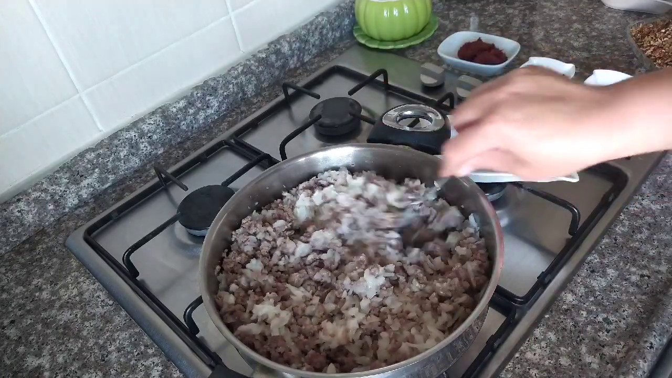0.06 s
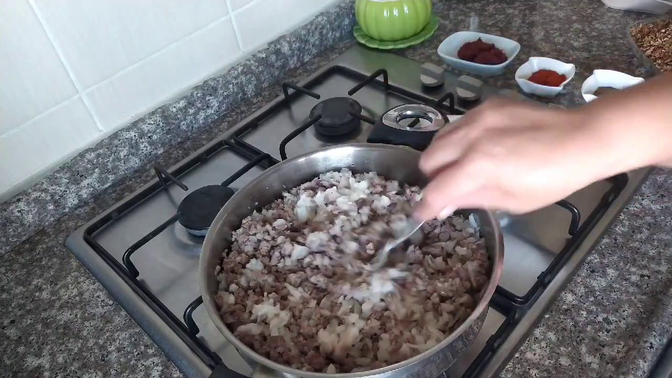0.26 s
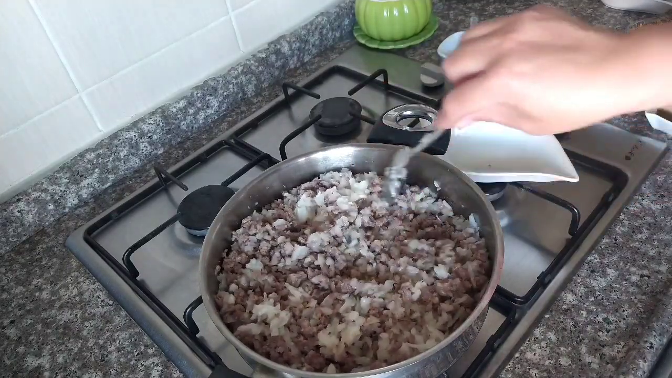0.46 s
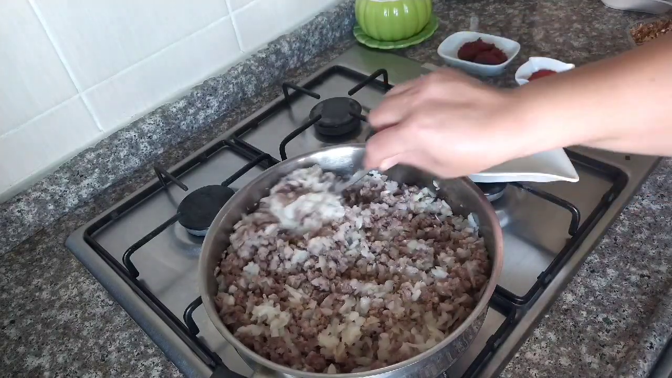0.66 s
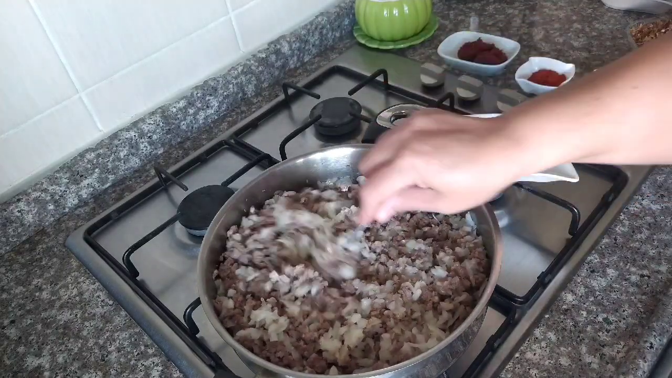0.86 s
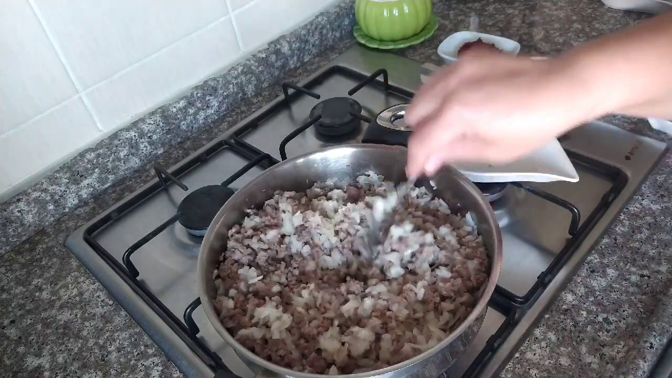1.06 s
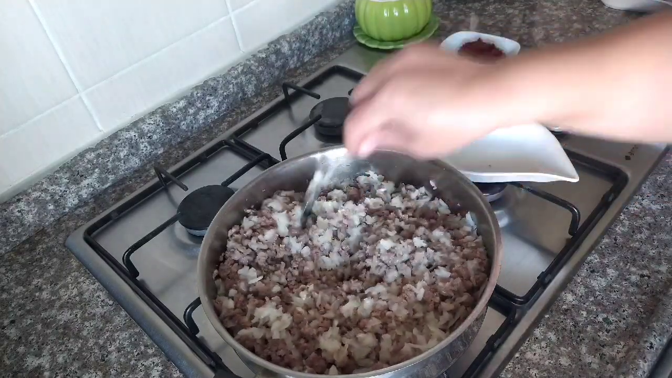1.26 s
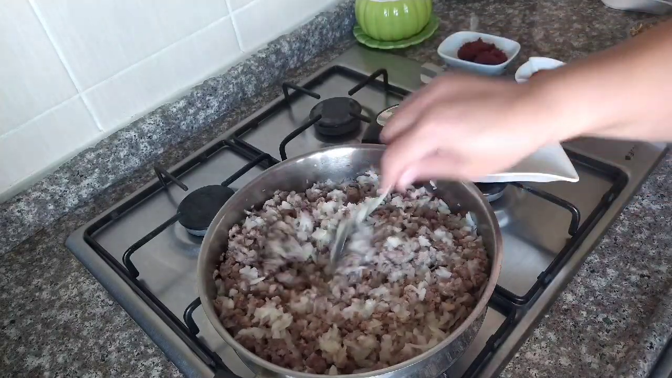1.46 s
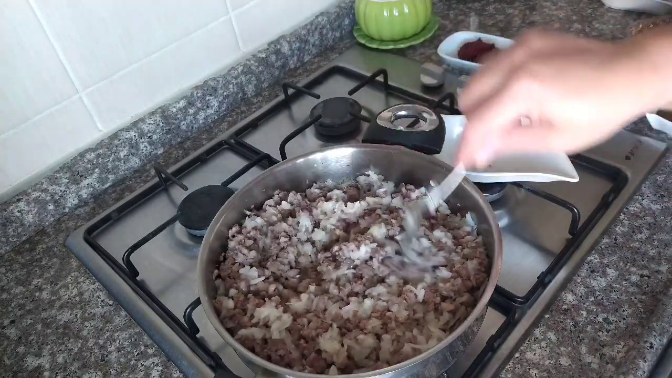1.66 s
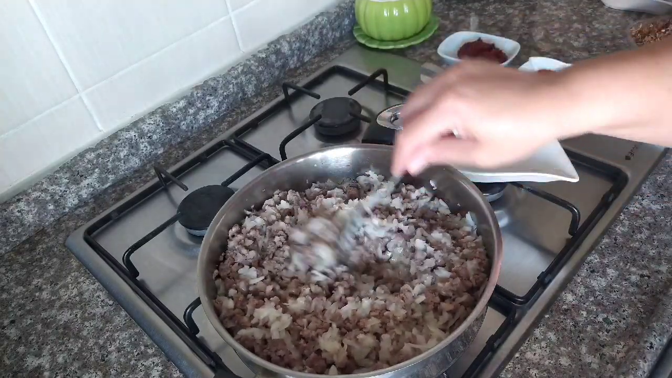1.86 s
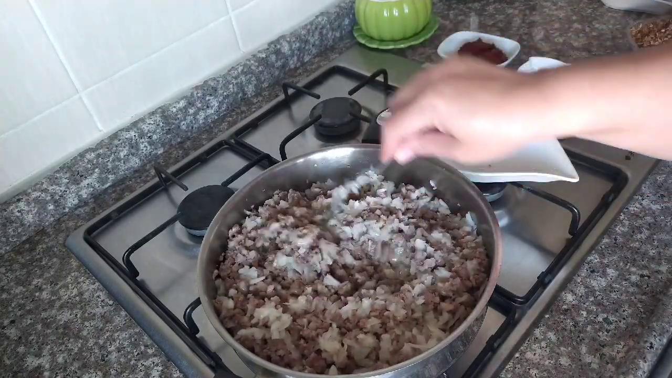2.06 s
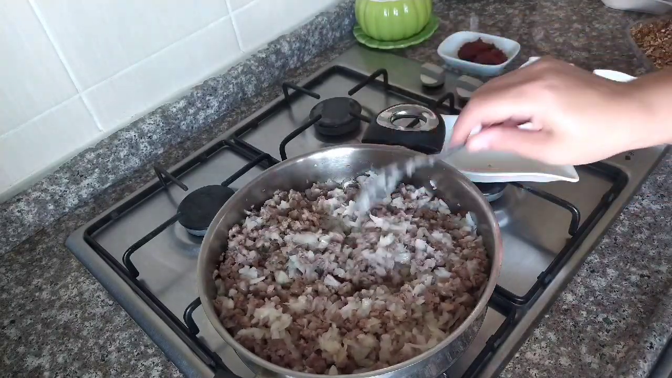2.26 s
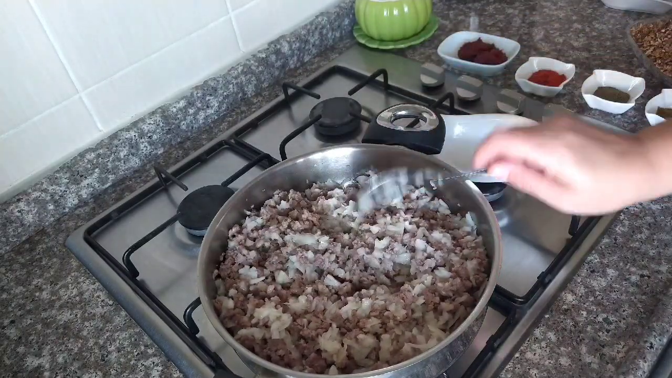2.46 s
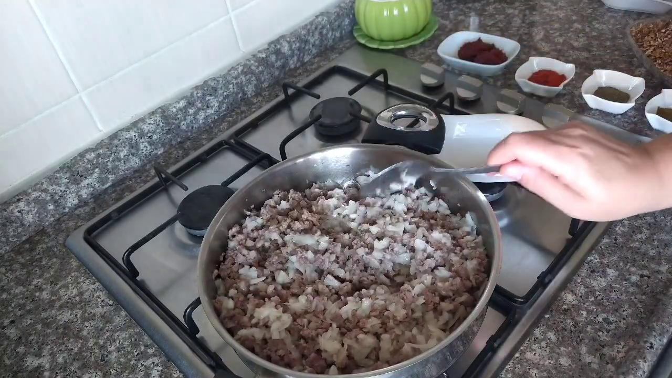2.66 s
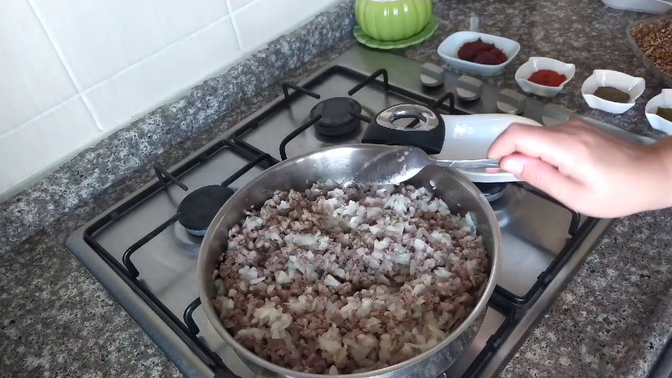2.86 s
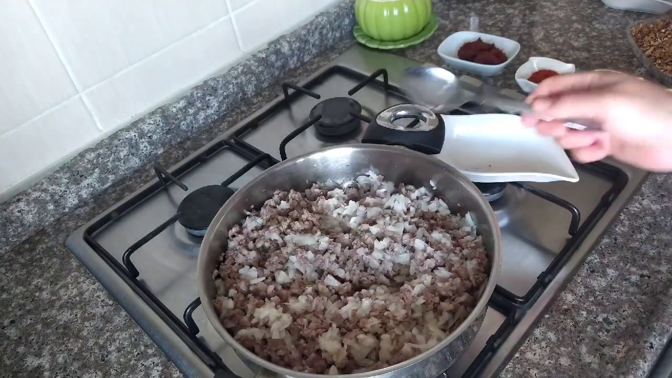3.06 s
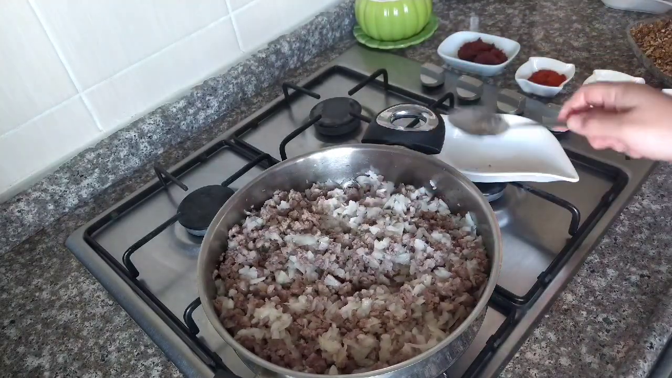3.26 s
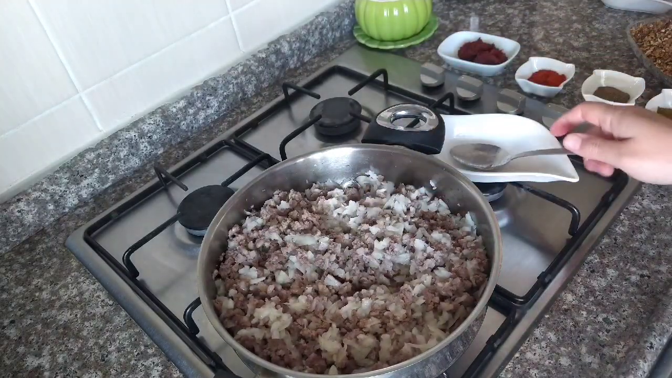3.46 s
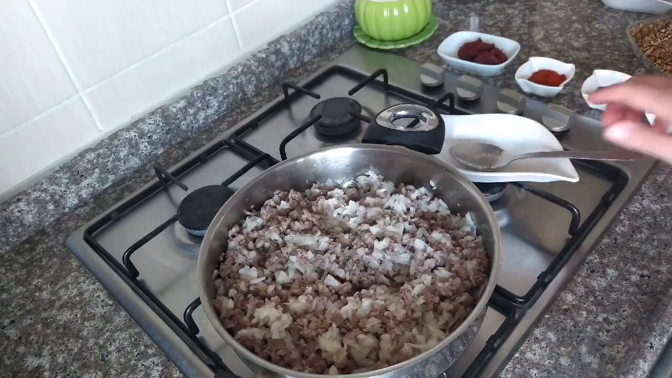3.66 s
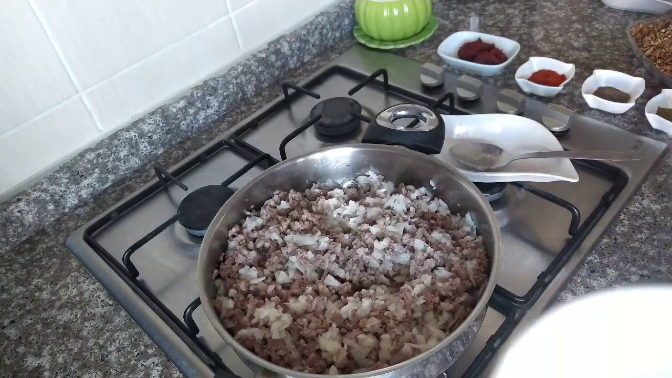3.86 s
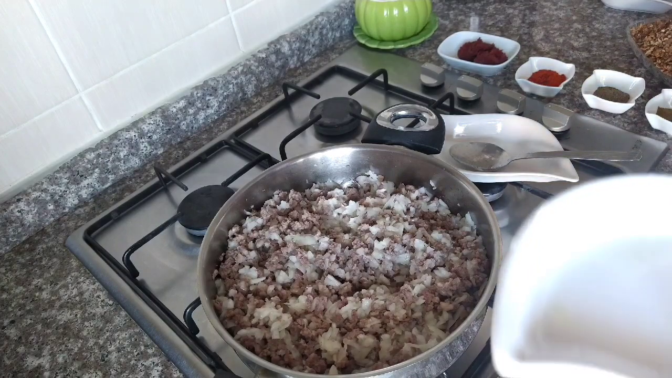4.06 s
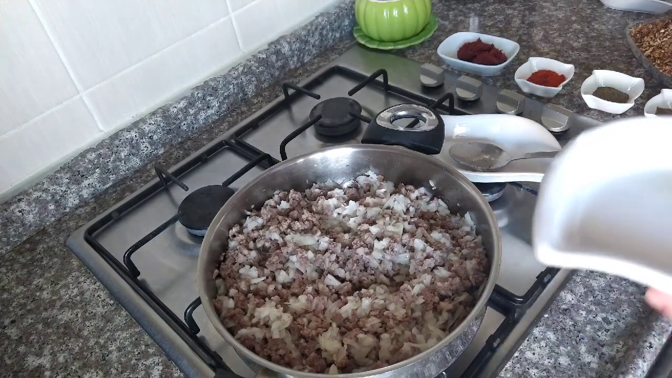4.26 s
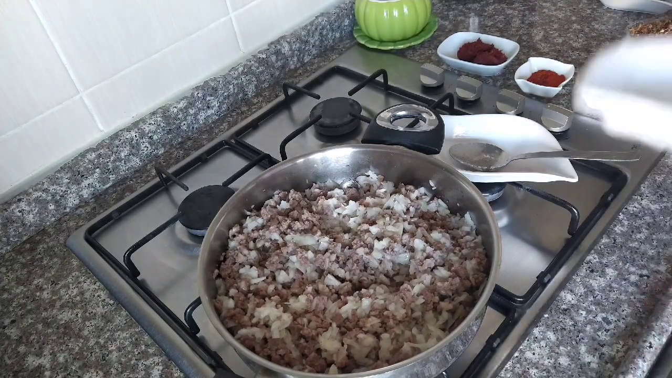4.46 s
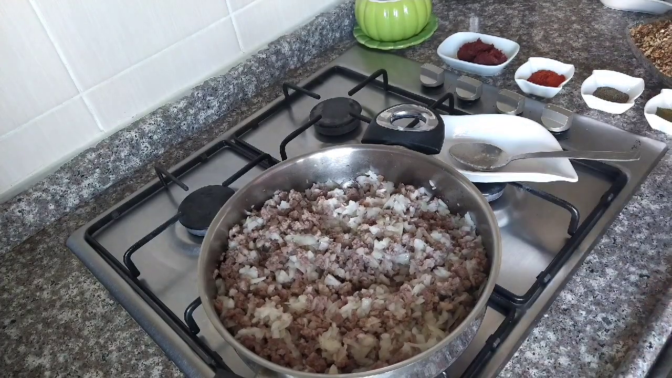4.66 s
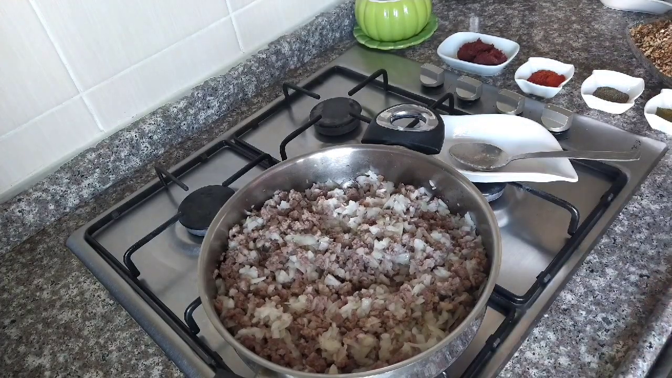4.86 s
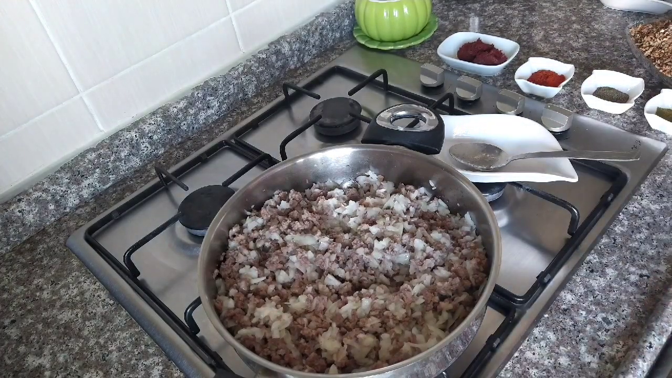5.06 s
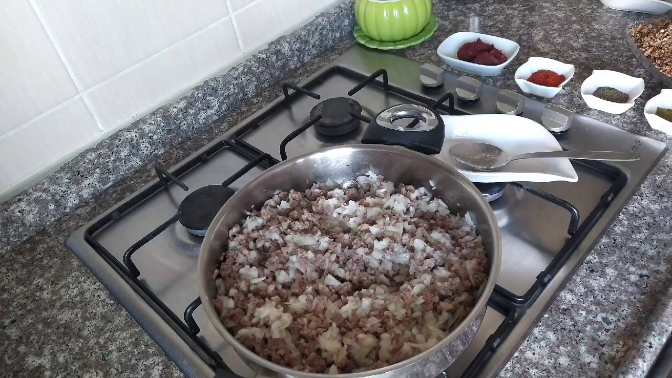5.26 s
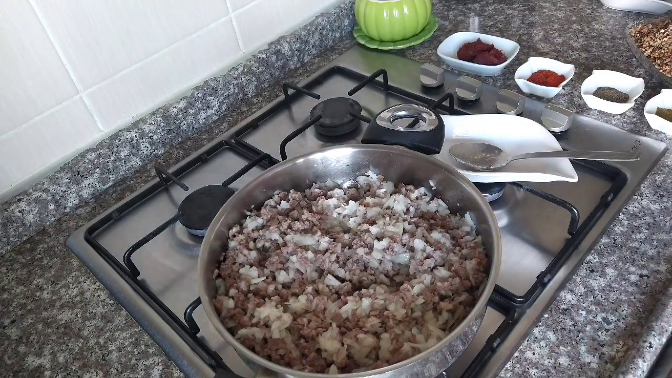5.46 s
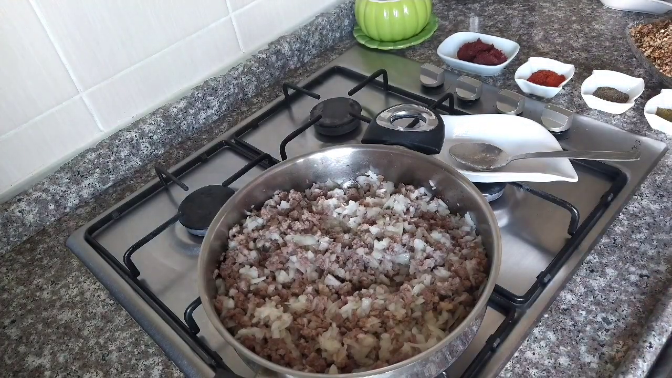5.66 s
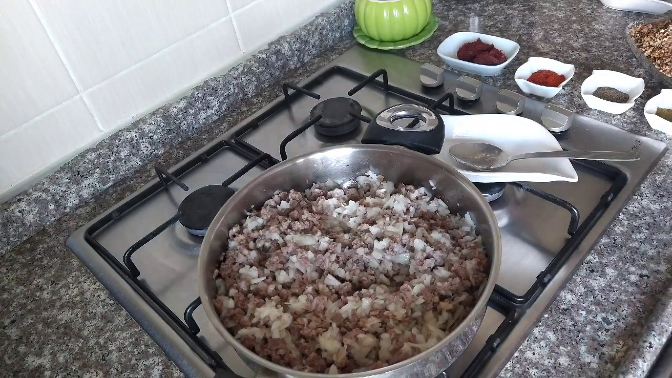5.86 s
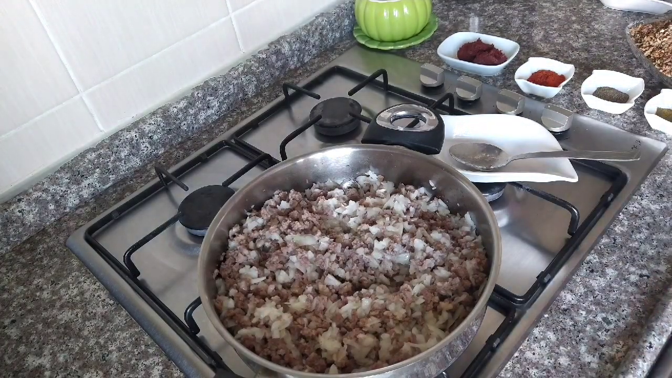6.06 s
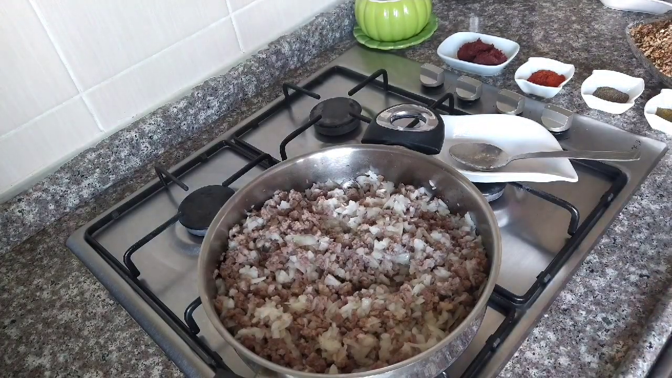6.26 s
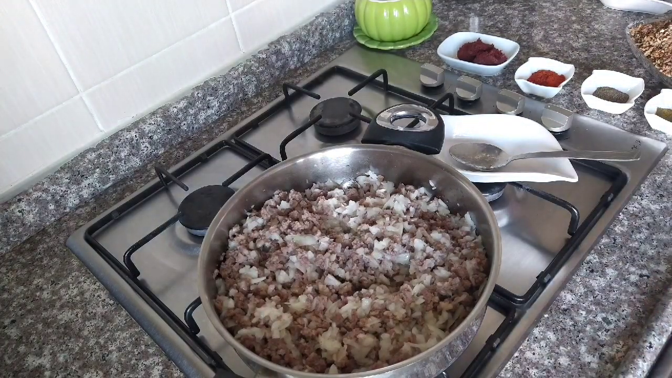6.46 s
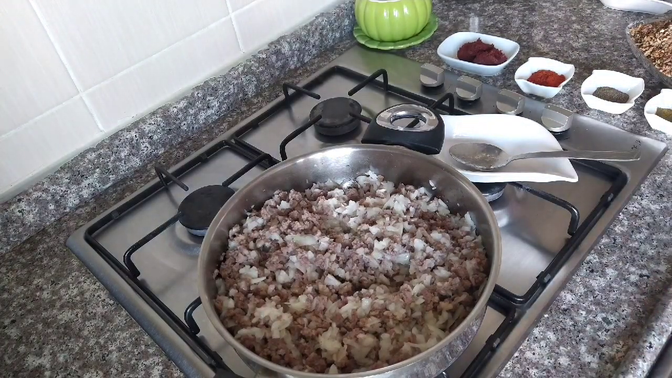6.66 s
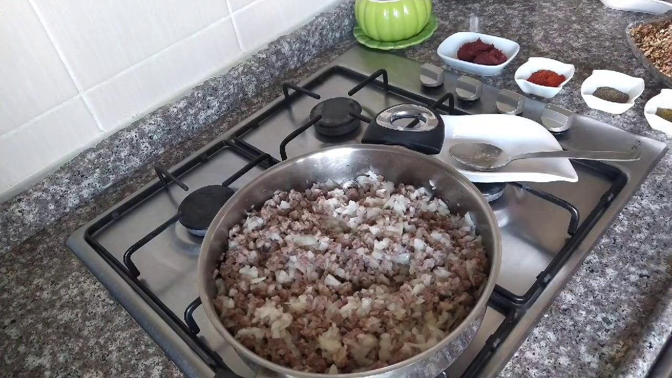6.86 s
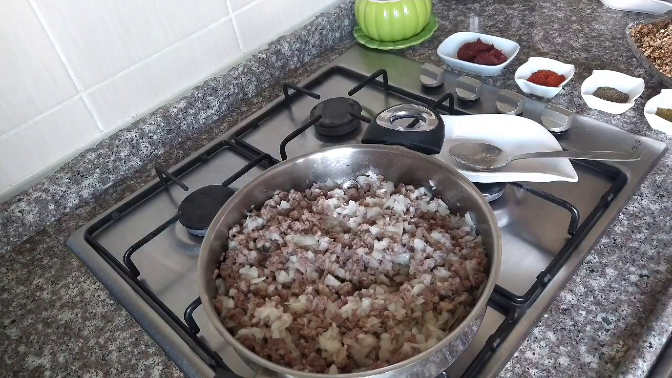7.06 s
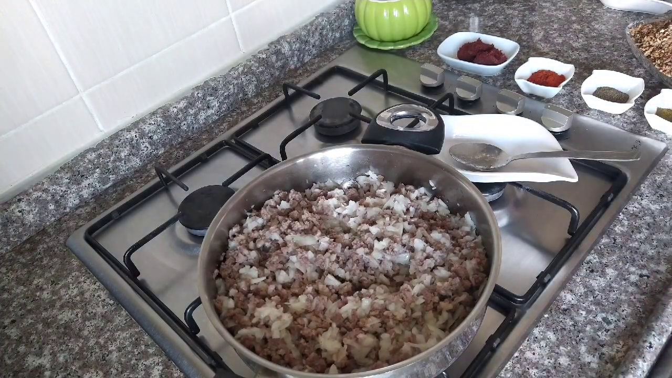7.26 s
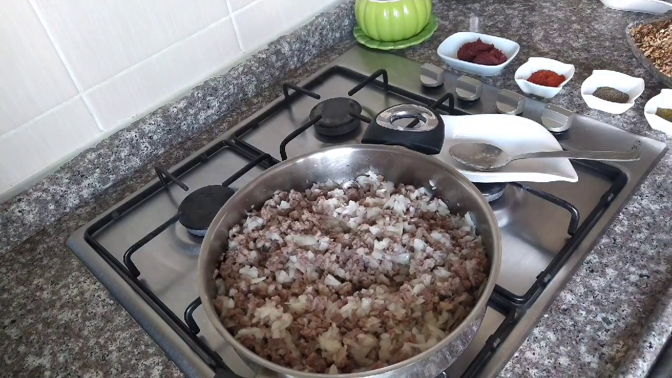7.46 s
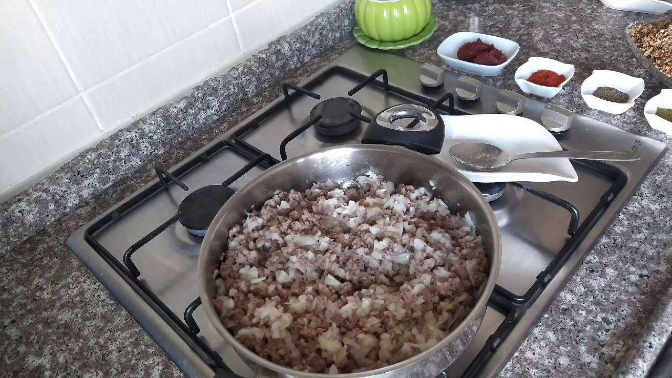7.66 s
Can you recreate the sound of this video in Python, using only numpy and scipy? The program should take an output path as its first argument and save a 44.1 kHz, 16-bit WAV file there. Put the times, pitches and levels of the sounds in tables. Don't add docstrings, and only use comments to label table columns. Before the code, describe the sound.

In a hard-walled kitchen, a metal spoon knocks sharply and scrapes briefly in a loaded steel pan, then gets tapped clean on the rim three times, each softer. It bounces lightly onto a china rest. After a stretch of quiet sizzling and low burner drone, a ceramic dish is bumped, set down rocking and clacked against another. Close stereo microphones catch the pan dry, with a short tiled-room tail.

```python
import sys
import numpy as np
from scipy import signal
from scipy.fft import rfft, irfft
from scipy.io import wavfile
from scipy.ndimage import uniform_filter1d, minimum_filter1d

SR = 44100
rng = np.random.default_rng(int(sys.argv[2]) if len(sys.argv) > 2 else 0)


def wav_out(sig):
    wavfile.write(sys.argv[1], SR, np.round(np.clip(np.atleast_2d(sig).T, -1, 1) * 32767).astype(np.int16))


def linear_from_db(decibels):
    return 10 ** (np.asarray(decibels, float) / 20)


N = 339862
TIME_S = np.arange(N) / SR


def level(x, rms_db):
    return x * linear_from_db(rms_db) / np.sqrt(np.mean(x ** 2))


def on_log(table, hz):
    table_hz, value = np.transpose(table)
    return np.interp(np.log(np.maximum(hz, 1)), np.log(table_hz), value)


def colour(x, table):
    size = x.shape[-1]
    gain = linear_from_db(on_log(table, np.fft.rfftfreq(size, 1 / SR)))
    return irfft(rfft(x) * gain, size)


def band(x, centre_hz, octaves):
    size = x.shape[-1]
    hz = np.maximum(np.fft.rfftfreq(size, 1 / SR), 1)
    return irfft(rfft(x) * np.exp(-(np.log2(hz / centre_hz) / octaves) ** 2), size)


def walk(rate_hz):
    hold = int(SR / rate_hz)
    steps = np.repeat(rng.standard_normal(N // hold + 1), hold)
    return 1.4 * uniform_filter1d(uniform_filter1d(steps, hold), hold)[:N]


def add(out, x, start_s, level_db, pan_db):
    i = int(start_s * SR)
    gain = linear_from_db(level_db + np.array([[pan_db], [-pan_db]]) / 2)
    out[:, i:i + x.shape[1]] += (x * gain)[:, :N - i]


def spaced(size, alike_hz=650):
    mid, side = rng.standard_normal((2, size))
    side = side + 0.26 * np.cumsum(side) * alike_hz / SR
    side = signal.sosfilt(signal.butter(1, alike_hz, "high", fs=SR, output="sos"), side)
    return np.array([mid + side, mid - side])


# hz, t60_s
ROOM_T60 = [(100, 0.95), (500, 0.7), (2000, 0.42), (6000, 0.44), (14000, 0.28)]


def kitchen(x):
    size = int(0.8 * SR)
    t, noise = TIME_S[:size], spaced(size)
    tail = 0
    for hz in 62.5 * 2.0 ** np.arange(9):
        tail = tail + band(noise, hz, 0.85) * linear_from_db(-60 * t / on_log(ROOM_T60, hz))
    tail = tail * (1 - np.exp(-t / 0.0077))
    tail = tail / np.sqrt(np.sum(tail ** 2) / 2)
    return signal.fftconvolve(x, tail, axes=1)[:, :N]


# hz, density_db (per Hz)
DRONE_COLOUR = [(12, -19), (20, 2.5), (71, -3.5), (106, -7), (135, -3.5), (167, -4.5), (270, -7.5),
                (304, 4), (377, -7.5), (579, -3.5), (622, -6.5), (700, -3), (1430, -1.5), (1950, -6),
                (6000, -25.5), (7800, -11.5), (13200, -120)]
# hz, level_db
HUM = [(101, -65.5), (305, -64.5), (355, -69.5), (412, -68), (459, -63.5)]


def drone():
    mid, side = colour(rng.standard_normal((2, N)), DRONE_COLOUR)
    out = 0
    for hz in 25 * 2.0 ** np.arange(9):
        apart = np.clip(hz / 1360, 0.25, 1) * np.array([[1], [-1]])
        flicker = linear_from_db(0.81 * walk(12))
        out = out + flicker * (band(mid, hz, 0.63) + apart * band(side, hz, 0.53))
    hums = sum(level(band(rng.standard_normal(N), hz, 0.086), level_db) for hz, level_db in HUM)
    return level(out, -49.5) + hums


# hz, density_db (per Hz)
SIZZLE_COLOUR = [(1470, -9.5), (2500, -6), (4260, -7), (4620, -9), (4840, -6.5), (5620, -8.5), (7470, -6),
                 (10200, -0.5), (11700, -12.5), (15000, -19)]
# start_s, peak_db, centre_hz
SPITS = [(1.203, -32, 8400), (3.385, -34, 8900), (3.7723, -36, 9600), (3.8467, -33, 8600),
         (4.009, -33.5, 8800), (4.1894, -37, 10200), (4.2976, -33.5, 8350), (4.8283, -36, 8740),
         (4.8494, -39, 10300), (5.009, -38, 8720), (5.07, -37, 9400), (5.21, -37, 9120), (5.299, -39, 9500),
         (5.9995, -37, 8000), (6.071, -32, 8700), (6.119, -34, 10100), (6.169, -37, 9000),
         (7.519, -36.5, 7750)]


def sizzle():
    sizzle_db, stirred_db, stir_ends_s, settle_s, cooling_db_per_s = -43.5, 2, 1.5, 1, 0.15
    pops = rng.standard_normal((2, N))
    flicker_db = 1.5 * rng.exponential(size=N) + 0.9 * walk(22) + 0.8 * walk(60)
    hiss = level(colour(pops * linear_from_db(flicker_db), SIZZLE_COLOUR), 0)
    lively_db = stirred_db * np.exp(-np.maximum(TIME_S - stir_ends_s, 0) / settle_s)
    flare_db = 3.7 * np.exp(-((TIME_S - 2.54) / 0.15) ** 2)
    out = hiss * linear_from_db(sizzle_db + lively_db + flare_db - cooling_db_per_s * TIME_S)
    t, spit_t60_s, spread_db = TIME_S[:SR // 8], 0.23, 2
    shape = (1 - np.exp(-t / 0.0011)) * linear_from_db(-60 * t / spit_t60_s)
    for start_s, peak_db, centre_hz in SPITS:
        spit = level(band(rng.standard_normal((2, len(t))), centre_hz, 0.5), 0)
        add(out, spit * shape, start_s, peak_db - 6, spread_db * rng.standard_normal())
    return out


# start_s, thud_db (pan support), boom_db (cupboards), boom_hz
JOLTS = [
    (0.532, -41, -70, 200),
    (1.268, -47, -70, 200),
    (2.413, -35.5, -35.5, 210),
    (2.557, -34, -34, 199),
    (2.691, -35, -34.5, 193),
    (3.509, -41, -52, 151),
    (6.288, -63, -38, 175),
    (6.546, -70, -26, 175),
    (6.853, -62, -26.5, 157),
]


def booms():
    out, t = np.zeros((2, N)), TIME_S[:SR // 2]
    shape = (1 - np.exp(-t / 0.033)) * linear_from_db(-60 * t / 0.38)
    for start_s, _, boom_db, boom_hz in JOLTS[2:]:
        hollow = level(band(spaced(len(t), alike_hz=900), boom_hz, 0.26), 0)
        add(out, hollow * shape, start_s, boom_db, -1.5)
    return out


def thumps():
    out, t = np.zeros((2, N)), TIME_S[:SR // 3]
    swing = sum(gain * np.sin(2 * np.pi * hz * t) for hz, gain in [(44, 1), (62, 0.5), (104, 0.61)])
    thud = swing * (1 - np.exp(-(t / 0.017) ** 2)) * linear_from_db(-60 * t / 0.4)
    for start_s, thud_db, _, _ in JOLTS:
        add(out, np.array([thud, thud]), start_s, thud_db, -2.5)
    return out


def blows(events, modes, crack, crack_t60_s, rise_s, split=0.0067, scatter_db=1.5, sent=0.5,
          longest_s=0.7, snap_db=-12, wander=0.16):
    near, far, t = np.zeros((2, N)), np.zeros((2, N)), TIME_S[:SR // 2]
    hz, mode_db, t60_s = (np.repeat(column, 2)[:, None] for column in np.transpose(modes))
    twin = (np.arange(len(hz)) % 2)[:, None]
    mode_db = mode_db - 7 * twin
    t60_s = np.clip(t60_s, 0.02, longest_s)
    rise = 1 - np.exp(-(t / rise_s) ** 2)
    snap = linear_from_db(snap_db) * np.exp(-np.abs(t - rise_s) / 0.0005)
    lead_rad = np.clip(hz / 900, 0, 1) * np.pi / 4 * np.array([1, -1])[:, None, None]
    for start_s, peak_db, pan_db, ring_db, room_db in events:
        burst = level(colour(spaced(len(t)), crack), 0) * (linear_from_db(-60 * t / crack_t60_s) + snap)
        luck = rng.standard_normal((3, len(hz), 1))
        decay = linear_from_db(mode_db + scatter_db * luck[0] - 60 * t / t60_s)
        pitch_hz = hz * (1 + split * (wander * luck[1] - twin))
        swing = np.sin(2 * np.pi * pitch_hz * t + lead_rad * np.sign(luck[2]))
        ring = np.sum(decay * swing, axis=1)
        ring = linear_from_db(ring_db) * ring / np.sqrt(np.sum(linear_from_db(2 * mode_db)) / 2)
        add(near, rise * (burst + ring), start_s - rise_s, peak_db, pan_db)
        add(far, rise * (burst + sent * ring), start_s - rise_s, peak_db + room_db, 0)
    return np.array([near, far])


# hz, density_db (per Hz)
DISH_STACK = [
    (6.851, -9.5, -0.84, 0.006, -21),
    (6.860, -16, -0.064, 0, -5.5),
    (6.888, -25, -0.081, 0, -8),
]
STACK_MODES = [(170, -14, 0.4), (1975, 1, 0.08), (2398, 1, 0.38), (2474, -8, .2), (3032, 3, 0.25),
               (3490, -14, .2), (3820, -7, 0.3), (4519, -2, 0.21), (5060, -11, .22), (5430, -10, 0.17),
               (5860, -11, .17), (6500, -9, 0.2), (7030, -14, 0.3), (8370, -8, 0.25)]
STACK_CRACK = [(60, -28.5), (400, -13), (2400, -7), (3400, -13), (4100, -25), (6000, -22), (9500, -21),
               (12500, -65)]


def dish_stacked():
    return blows(DISH_STACK, STACK_MODES, STACK_CRACK, 0.26, 0.005, split=0.0078, scatter_db=2.5,
                 snap_db=-27, longest_s=0.44)


DISH_DOWN = [
    (6.542, -13.5, -1.2, 0, -6),
    (6.558, -18, 1.5, 0, -10.5),
    (6.583, -21, 1.5, 0, -17),
    (6.623, -20.5, 0.45, 0.0065, -12),
    (6.667, -25, -1.2, 0, -29),
    (6.718, -37, -1.1, 0.004, -9),
]
DISH_MODES = [(352, -9, 0.45), (1833, -6, 0.26), (1907, -2, 0.42), (1957, -6, 0.3), (1066, -9, .35),
              (1297, -9, .35), (2075, -7, 0.34), (2397, -2.5, 0.38), (3040, -4, 0.33), (3490, -17, .2),
              (3770, -9, 0.3), (4613, -19, 0.25), (5050, -19, 0.2), (5760, -16, 0.13)]
DISH_CRACK = [(60, -25), (350, -6.5), (680, -2), (1100, -3.5), (2200, -7), (4200, -25), (10000, -28),
              (13000, -44.5)]


def dish_set_down():
    return blows(DISH_DOWN, DISH_MODES, DISH_CRACK, 0.23, 0.003, split=0.0084, scatter_db=2, snap_db=-32)


NUDGE = [
    (6.289, -21, 1, -17, -2.5),
    (6.296, -22.5, 1, -21, -12),
]
NUDGE_CRACK = [(47, -40), (80, -14), (500, 1.5), (1100, 0.5), (1860, 0), (2500, -16), (3300, -34),
               (6500, -67)]


def dish_nudged():
    return blows(NUDGE, DISH_MODES[:4], NUDGE_CRACK, 0.042, 0.00204, snap_db=-1.5)


LAID = [
    (3.504, -17.5, 0.91, 0, -8.5),
    (3.510, -25.5, 0.25, 0, 2.5),
    (3.517, -22, 1, 0, -24),
    (3.526, -21, 0, 0, -31),
    (3.556, -29, 0, 0, -15),
]
REST_MODES = [(2815, 4, 0.17), (3835, -5, 0.24), (4514, -1, 0.25), (4834, -5, 0.22), (5490, -12, .15),
              (5830, -3.5, 0.22), (7243, 1, 0.17), (7410, -3, 0.15), (7709, -1, .25), (8150, -3, 0.2),
              (9279, -1, 0.15), (9589, 0, 0.2), (10229, 0, 0.14), (10360, 4.5, 0.15)]
REST_CRACK = [(60, -20), (2240, -16.5), (2830, -5), (3500, -15.5), (4640, -6), (5220, -15), (7420, -9),
              (10100, -3.5), (16500, -26)]


def spoon_laid():
    return blows(LAID, REST_MODES, REST_CRACK, 0.09, 0.0024, split=0.0109, scatter_db=2, wander=0.048,
                 sent=0.38, longest_s=0.21)


BRUSH = [
    (.519, -37, 0, -22, -12),
    (3.366, -42.5, 0, -1, -16),
]
BRUSH_MODES = [(1630, 4, 0.13), (2850, -1, .05)]
BRUSH_CRACK = [(300, -30), (1500, -8), (3000, 15), (9000, -32), (14000, -40)]


def cutlery_brushed():
    return blows(BRUSH, BRUSH_MODES, BRUSH_CRACK, 0.04, 0.0016)


TICK = [
    (.499, -47, 0, -20, -20),
    (1.134, -33, -1, -20, -18),
    (4.832, -32.5, -1, -15, -9),
    (4.85, -36, 3, -24, 1),
]
PAN_MODES = [(810, 2.5, 0.048), (1890, 6, 0.034), (2555, -8, 0.051), (2800, 7, 0.37), (4010, 11, 0.075),
             (5040, -12, 0.082), (5950, 11, 0.18), (7260, -44, 0.1), (7700, -9, 0.16), (8800, -8, 0.057),
             (9600, -4, 0.084), (10100, 9, 0.2)]


def pan_ticks():
    return blows(TICK, PAN_MODES, REST_CRACK, 0.028, 0.0009)


TAPS = [
    (2.415, -4.5, 1, -3, -11),
    (2.561, -7, 1, -4, -11.5),
    (2.691, -11.5, 0, -3.5, -9),
]
RIM_MODES = [(327, -11, 0.2), (690, -15, 0.2), (1788, 11, 0.07), (1950, 4, .05), (4100, -4, 0.2),
             (4704, -1, 0.19), (5445, 10, 0.06), (5850, -6, 0.18), (6620, 5, 0.07), (7230, -4, .15),
             (8730, 3, .1), (9050, -2, .08), (9490, -5, .2), (9870, -1, .13)]
RIM_CRACK = [(30, -33), (330, -17), (500, -21), (900, -9.5), (1500, -5), (1800, -4.5), (2300, -9.5),
             (3400, -16.5), (4700, -16), (5440, -7), (7280, -10), (9000, -1), (12000, -12.5), (16500, -31)]
RIM_MODES_LOWER = [(328, -10, 0.2), (690, -14, 0.15), (1188, -7, .08), (1750, -1, 0.06), (4103, -9, 0.2),
                   (4704, -7, 0.2), (5500, 3, .07), (6341, 6, 0.075), (6740, 4, .07), (7200, -3, 0.07),
                   (8700, -3, 0.075), (9600, 4, 0.087), (10300, 2, 0.082), (10500, 4, 0.089)]
RIM_CRACK_LOWER = [(18, -37), (30, -28), (340, -6), (533, -9), (676, -16), (1090, -4.5), (1490, -4),
                   (3210, -10.5), (3570, -17.5), (4650, -8.5), (8990, -1), (14100, -15.5), (16500, -39)]


def rim_taps():
    first = blows(TAPS[:1], RIM_MODES, RIM_CRACK, 0.063, 0.0011)
    later = blows(TAPS[1:], RIM_MODES_LOWER, RIM_CRACK_LOWER, 0.072, 0.00121, scatter_db=2)
    return first + later


# hz, density_db (per Hz)
DRAG_COLOUR = [(290, -52), (500, -17), (1030, -4.5), (1570, 2.5), (2890, 3), (4940, 0.5), (9630, 5),
               (15000, -10)]
# start_s, hold_s, level_db, bright_db, fade_db_per_s
STROKES = [
    (0, 0.0054, -32, 3.5, 101),
    (0.574, .16, -42, 9, 300),
    (0.741, 0.0092, -30, -3.5, 498),
    (0.773, .012, -42, 2, 400),
    (0.791, .012, -38.5, -2, 402),
    (0.819, 0.016, -33.5, -2, 500),
    (0.847, 0.016, -32.5, -3.5, 900),
]


def spoon_scrapes():
    out, rise_db_per_s = np.zeros((2, N)), 600
    clicks = rng.standard_normal((2, N))
    uneven_db = 2.8 * np.minimum(rng.exponential(size=N), 6) + 1.6 * walk(90)
    grit = colour(clicks * linear_from_db(uneven_db), DRAG_COLOUR)
    dull = signal.sosfilt(signal.butter(2, 5500, fs=SR, output="sos"), grit)
    low, high = level(dull, 0), level(grit - dull, 0)
    for start_s, hold_s, level_db, bright_db, fade_db_per_s in STROKES:
        early_s = np.maximum(start_s - TIME_S, 0)
        late_s = np.maximum(TIME_S - start_s - hold_s, 0)
        stroke = linear_from_db(level_db - rise_db_per_s * early_s - fade_db_per_s * late_s)
        out += stroke * (low + linear_from_db(bright_db) * high)
    return out


STIR_IN = [
    (0.532, -2.15, -1.2, -22.5, -12),
]
PAN_CRACK = [(40, -6), (450, -30), (740, 3.5), (1100, -4.5), (2400, -1), (4200, 0), (6500, -2), (9000, 0.5),
             (11000, -12), (16500, -48)]
STIR_OUT = [
    (1.267, -5.5, -0.91, -16.5, -9.5),
]
PAN_CRACK_OUT = [(40, -29), (1100, -15), (2040, -4), (3500, -4), (4800, -8), (6400, -3), (9400, 0),
                 (11000, -8), (16500, -49)]


def spoon_knocks():
    going_in = blows(STIR_IN, PAN_MODES, PAN_CRACK, 0.033, 0.0011, snap_db=2)
    coming_out = blows(STIR_OUT, PAN_MODES, PAN_CRACK_OUT, 0.047, 0.00041, snap_db=3)
    return going_in + coming_out


def scene():
    near, far = (spoon_knocks() + rim_taps() + cutlery_brushed() + pan_ticks() + spoon_laid()
                 + dish_nudged() + dish_set_down() + dish_stacked())
    scrape = spoon_scrapes()
    room = linear_from_db(3.5) * kitchen(far + linear_from_db(-10) * scrape)
    return near + room + scrape + thumps() + booms() + sizzle() + drone()


# hz, db
SPARED = [(2200, -30), (3200, -3.2), (4200, -1.7), (5500, -1.7), (8000, -2.7), (10500, -3.0), (12000, -1.2),
          (15000, -1.0), (15900, 30)]


def thin_treble(x):
    hz, _, z = signal.stft(x, SR, nperseg=1024)
    power = np.abs(z.sum(axis=0)) ** 2 + 1e-20
    smooth = uniform_filter1d(uniform_filter1d(power, size=4, axis=1), size=4, axis=0)
    patch = np.log(smooth + 1e-20)
    below_db = 10 / np.log(10) * (patch - uniform_filter1d(patch, size=31, axis=0))
    high = hz > 11500
    treble = power[high].sum(axis=0)
    steady = treble < 14 * minimum_filter1d(treble, size=3, origin=1)
    loudest = patch[hz > 1500].max(axis=0)
    masked = high[:, None] & (patch < loudest - np.log(10) * 4.4)
    lowest_db = minimum_filter1d(minimum_filter1d(below_db, size=3, axis=0), size=2, axis=1)
    weak = lowest_db < on_log(SPARED, hz)[:, None]
    dropped = (weak & steady) | masked
    return signal.istft(z * ~dropped, SR, nperseg=1024)[1][:, :N]


def band_limit(x):
    return signal.sosfilt(signal.butter(12, 16650, fs=SR, output="sos"), x)


def record(dry):
    hold = 0.12 * SR
    held = signal.lfilter([1 / hold], [1, 1 / hold - 1], np.abs(dry).max(axis=0))
    gain = (1 + held / 0.32) ** -0.3
    rounded = 0.85 * np.tanh(1.009 * dry * gain)
    top = signal.ellip(8, 0.2, 70, 16100, fs=SR, output="sos")
    mix = thin_treble(signal.sosfilt(top, rounded))
    return band_limit(mix)


dry = scene()
out = record(dry)
wav_out(out)
```